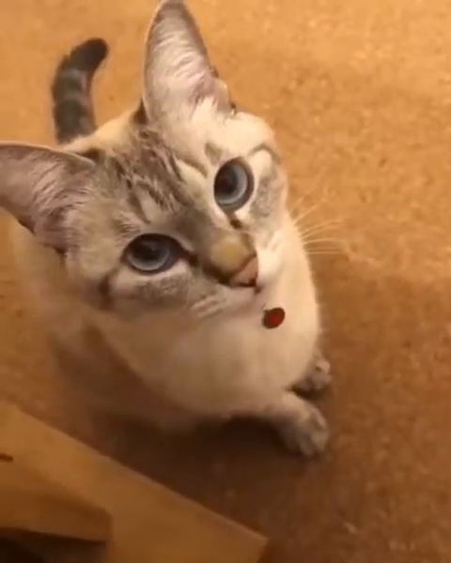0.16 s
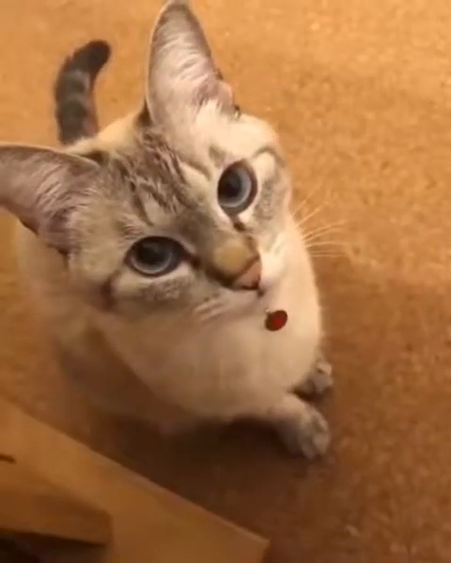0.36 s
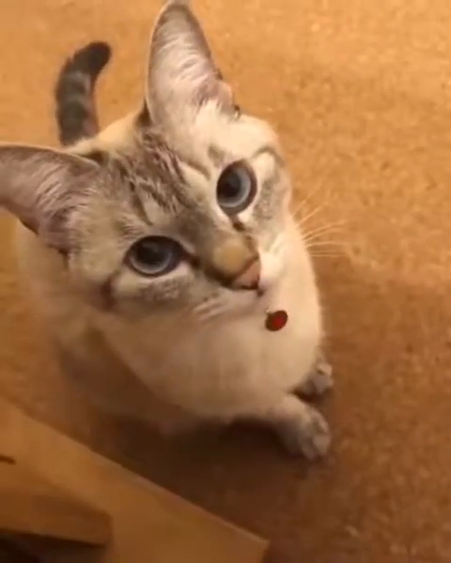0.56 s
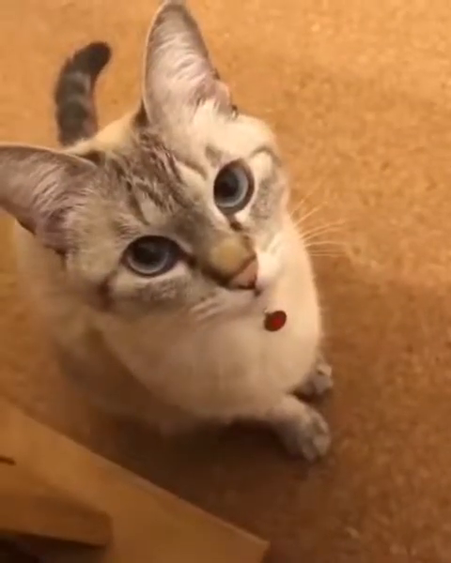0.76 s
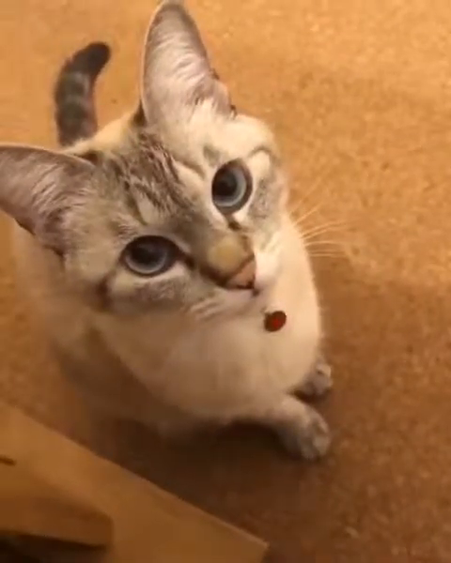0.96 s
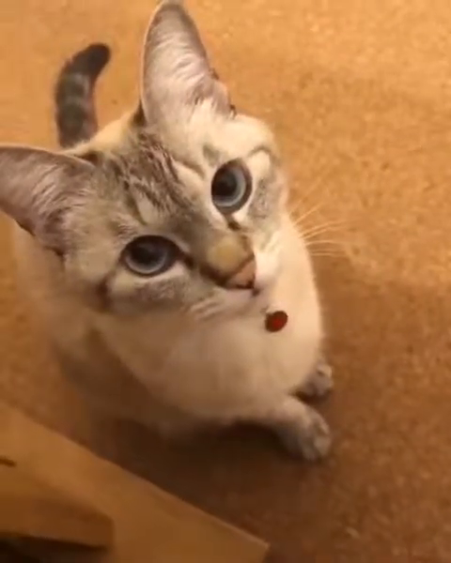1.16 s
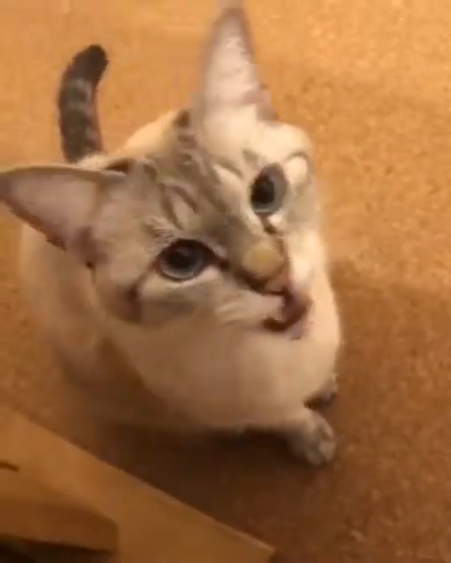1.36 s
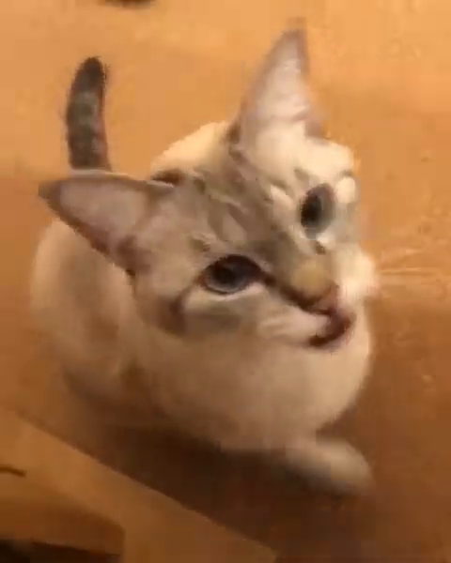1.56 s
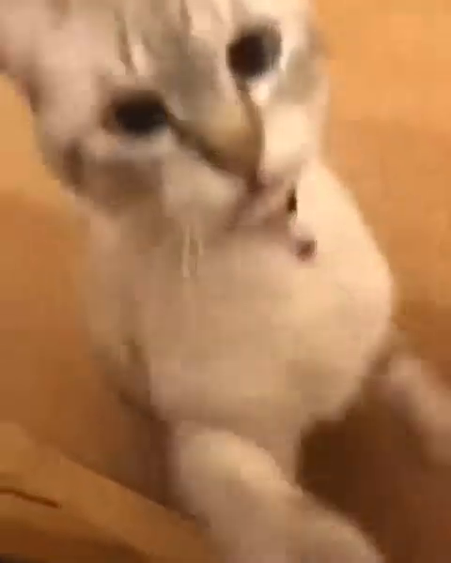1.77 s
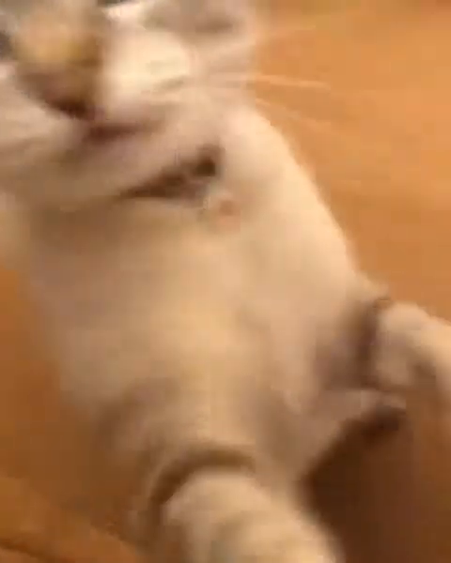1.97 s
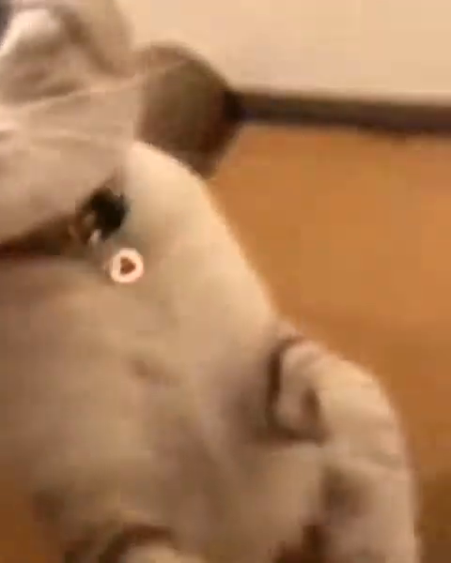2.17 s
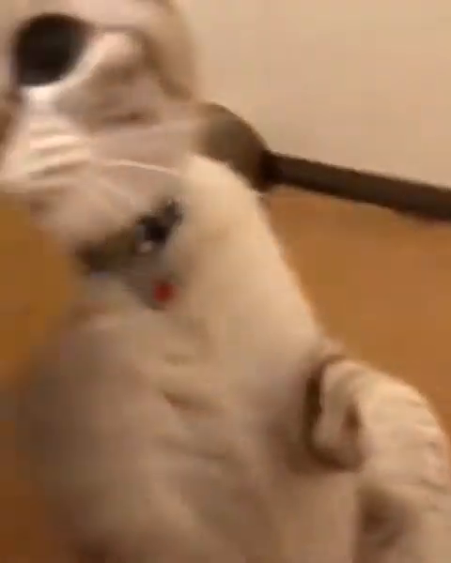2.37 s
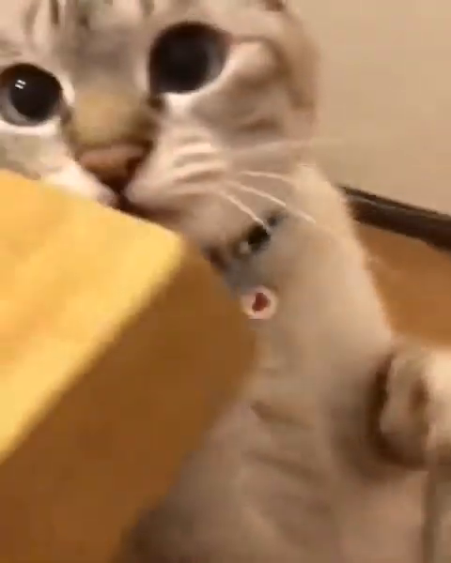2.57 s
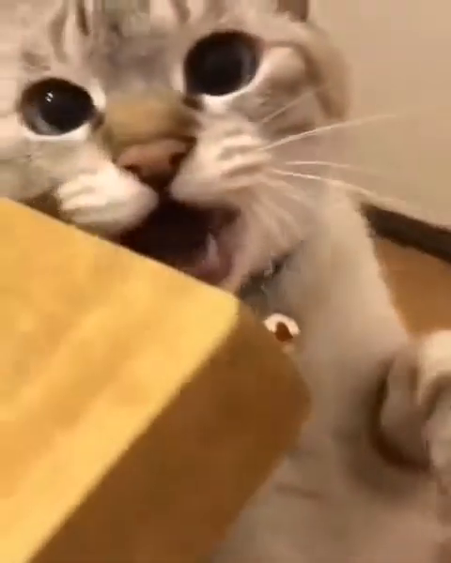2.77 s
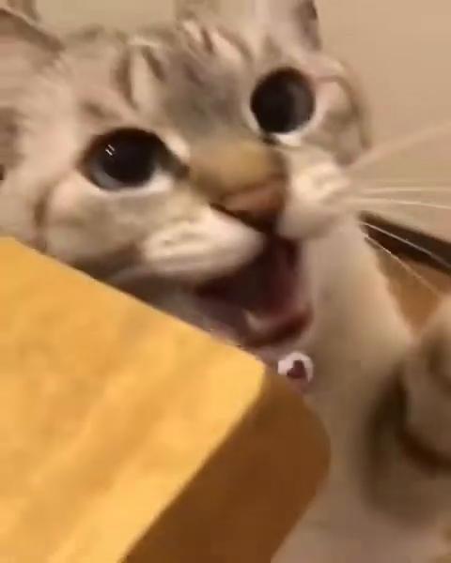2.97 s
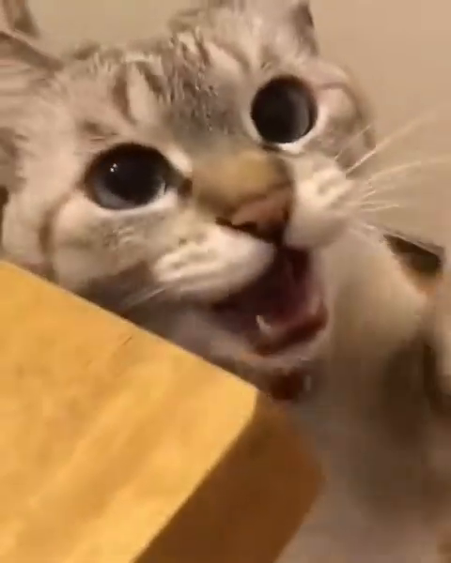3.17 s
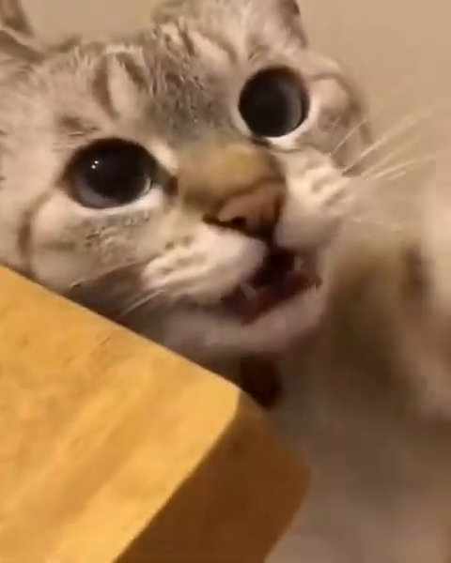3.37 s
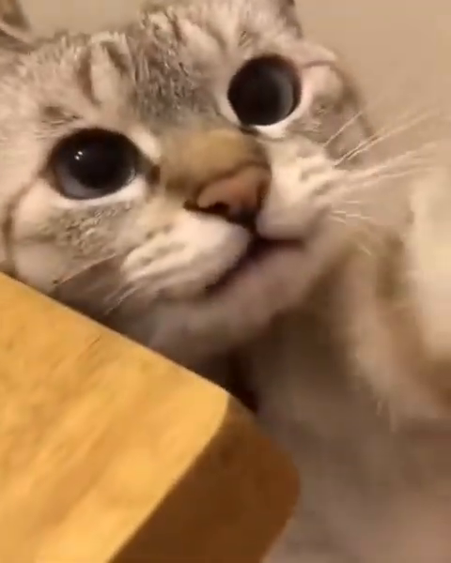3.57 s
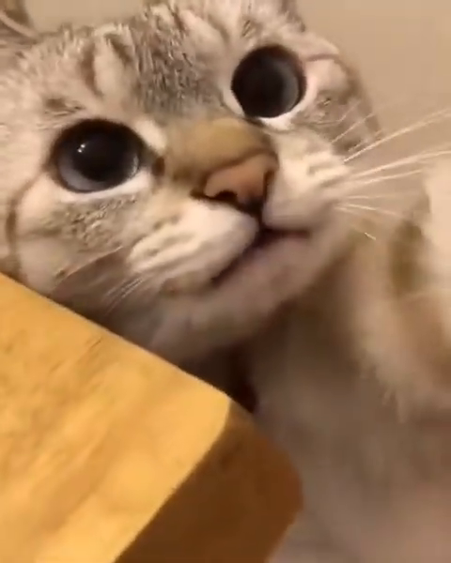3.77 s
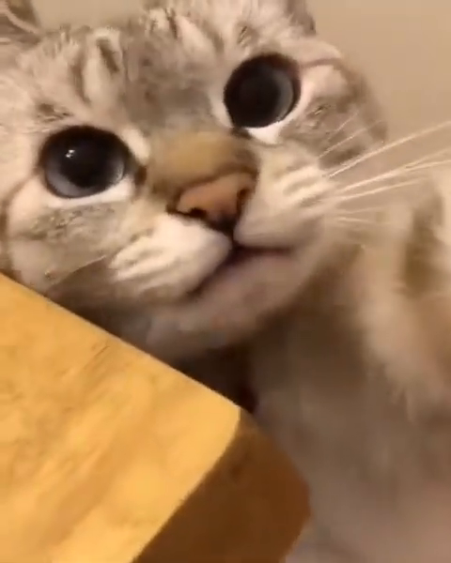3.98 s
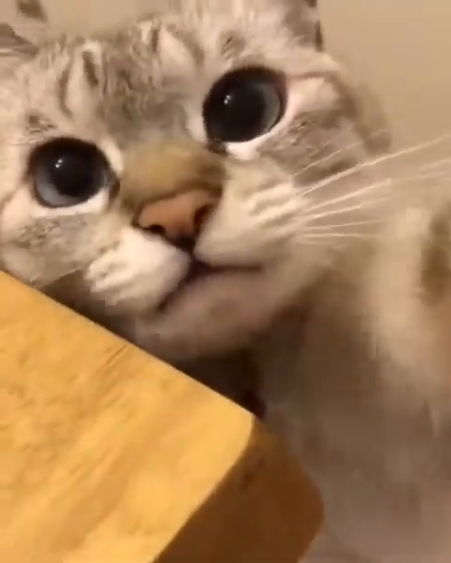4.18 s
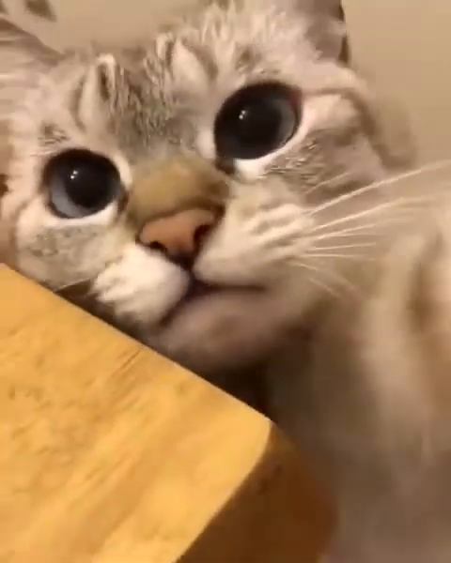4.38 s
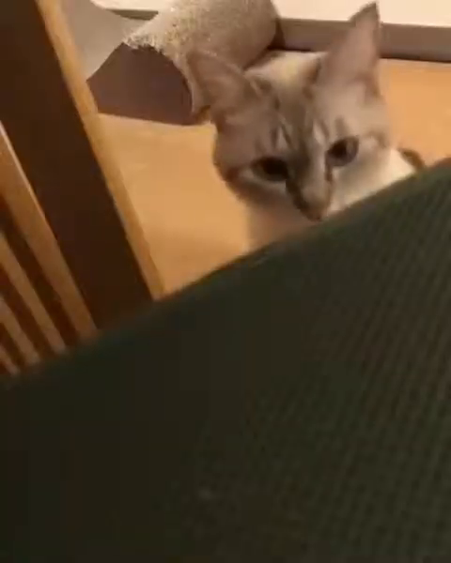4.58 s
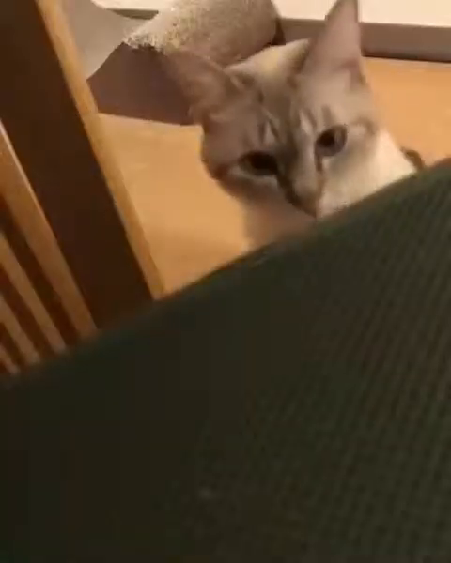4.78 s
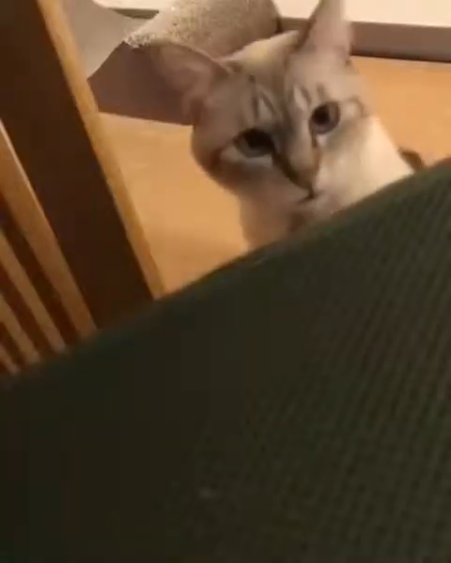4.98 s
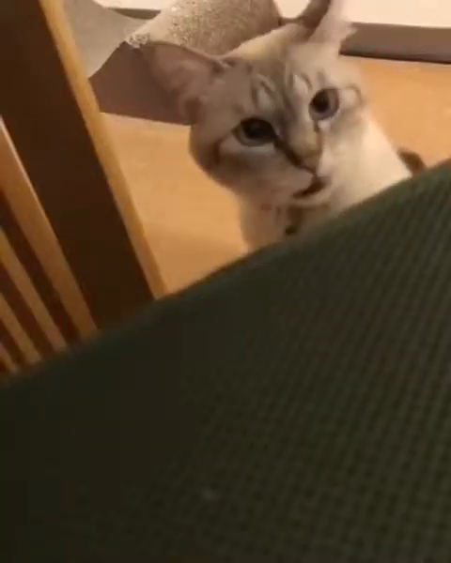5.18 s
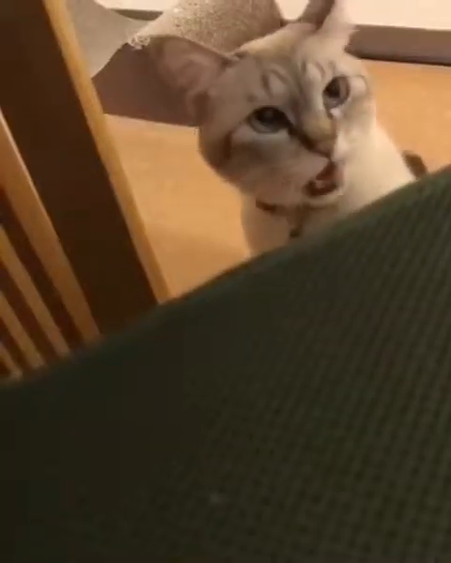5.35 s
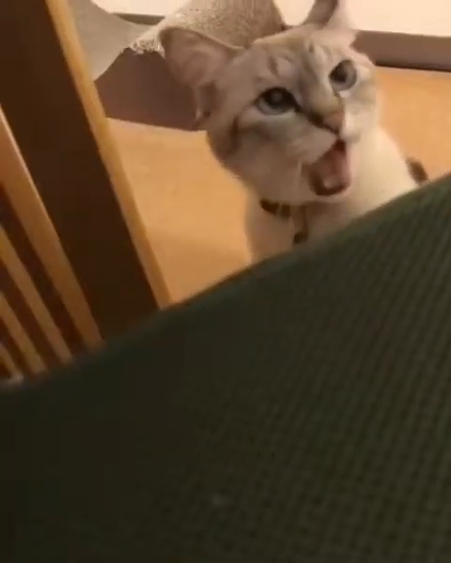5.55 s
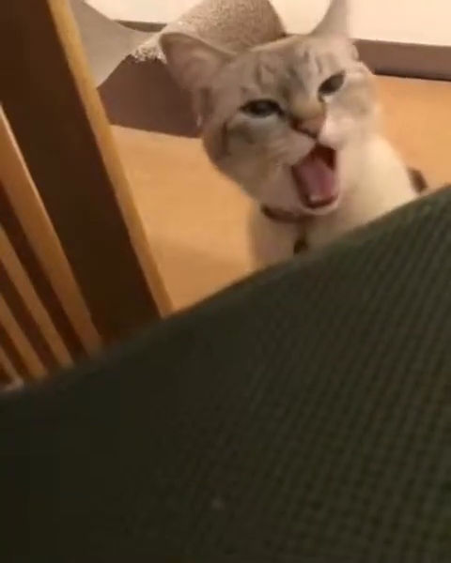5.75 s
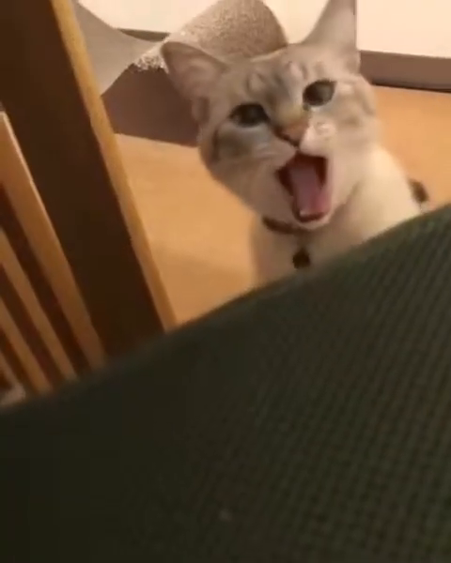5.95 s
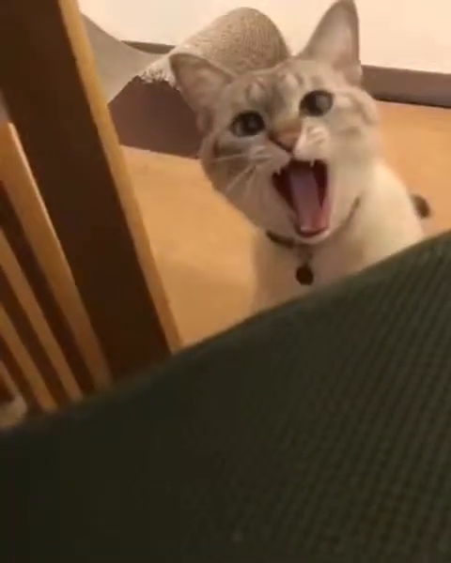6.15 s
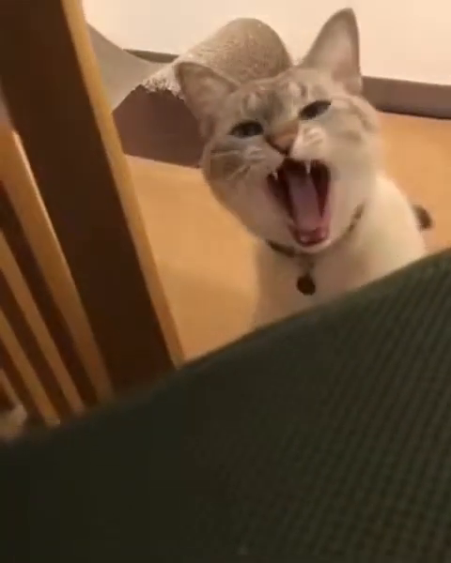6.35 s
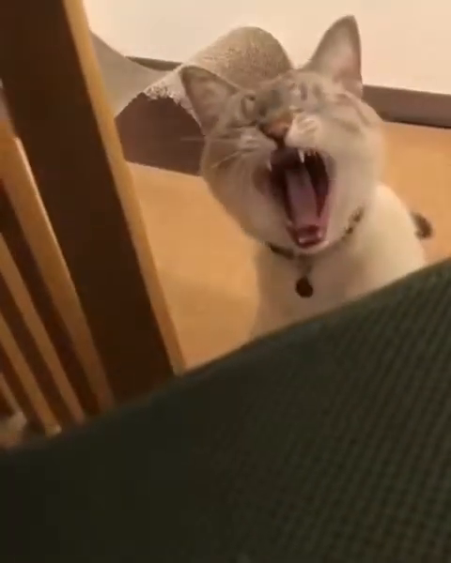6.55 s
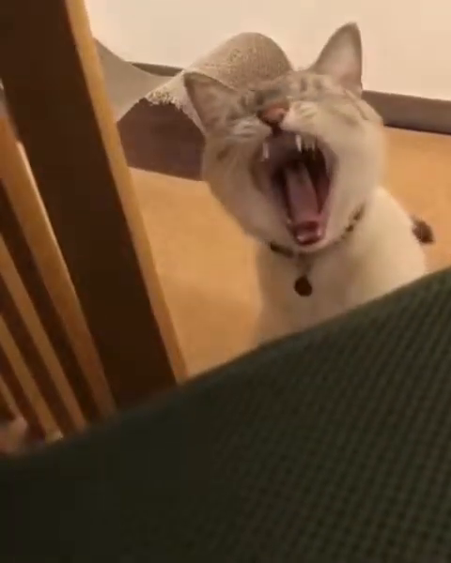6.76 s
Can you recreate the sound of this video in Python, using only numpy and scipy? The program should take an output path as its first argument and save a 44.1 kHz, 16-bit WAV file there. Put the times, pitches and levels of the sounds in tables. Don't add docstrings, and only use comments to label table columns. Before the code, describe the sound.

Quiet humming room, short cat mew, claws and paws scrambling, a fuller mew, brief silence, faint tag chinks, then a long sinking yawning meow.

```python
import sys
import numpy as np
from scipy import signal
from scipy.fft import rfft, irfft, next_fast_len
from scipy.io import wavfile
from scipy.ndimage import uniform_filter1d

SR = 44100
rng = np.random.default_rng(int(sys.argv[2]) if len(sys.argv) > 2 else 0)


def dump(signal):
    limited = np.clip(np.atleast_2d(signal).T, -1, 1)
    pcm = np.round(limited * 32767).astype(np.int16)
    wavfile.write(sys.argv[1], SR, pcm)


def natural_amplitude(level_db):
    exponent = np.asarray(level_db, float) / 20
    return 10 ** exponent


N = 300762
TIME = np.arange(N) / SR
CUT_START_S, CUT_END_S = 4.506, 4.651
LONGEST = 64000


def level(x, db):
    return x * natural_amplitude(db) / np.sqrt(np.mean(x ** 2))


def read(table, hz):
    f, db = np.transpose(table)
    return np.interp(np.log(np.maximum(hz, 1)), np.log(f), db)


def noise(table):
    size = next_fast_len(N)
    white = rfft(rng.standard_normal(size))
    hz = np.arange(len(white)) * SR / size
    return level(irfft(white * natural_amplitude(read(table, hz)), size)[:N], 0)


def band(x, lo_hz, hi_hz):
    return signal.sosfilt(signal.butter(2, [lo_hz, hi_hz], "band", fs=SR, output="sos"), x)


def walk(rate, size=N):
    k = max(int(SR / rate), 2)
    return level(uniform_filter1d(uniform_filter1d(rng.standard_normal(size), k), k), 0)


def chance(rate, n):
    return walk(rate, size=LONGEST)[:n]


def curve(table):
    s, db = np.transpose(table)
    return natural_amplitude(np.interp(TIME, s, db, left=-200, right=-200))


def bump(t, at, span, power):
    return np.exp(-(2 * (t - at) / span) ** power)


def room_tone(colour, db):
    return level(noise(colour) * natural_amplitude(0.4 * walk(2.5)), db)


# frequency in Hz, density in dB per Hz.
FIRST_AIR = [(15, -50), (25, -18), (49, -7.5), (65, 4.5), (81, -2), (108, -10), (147, -18), (245, -15),
             (274, -13), (320, -17), (399, -16.5), (446, -15), (499, -23), (5000, -43.5), (6500, -74),
             (11000, -120)]
# frequency in Hz, width in Hz, level in dB.
APPLIANCES = [(63, 21, -81.5), (273.1, 9, -76.5), (403, 9, -74)]


def first_room():
    tone = room_tone(FIRST_AIR, -61.5)
    for f, w, db in APPLIANCES:
        peak = [(f / 4, -120), (f - 3 * w, -40), (f, 0), (f + 3 * w, -40), (2 * f, -120)]
        tone = tone + natural_amplitude(db + 1.6 * walk(1.5)) * noise(peak)
    return tone


def hiss_and_edge():
    hiss = 0
    for lo in (4800, 6600, 8400, 10200):
        hi = lo + 1800
        colour = [(lo / 1.1, -30), (lo, 0), (hi, 0), (1.02 * hi, -30)]
        hiss = hiss + natural_amplitude(-93.5 + 2.2 * walk(45)) * noise(colour)
    edge_db = -102 + 10 * np.tanh(3 * walk(40) - 1)
    return hiss + natural_amplitude(edge_db) * noise([(12400, -40), (12600, 0), (13200, 0)])


# middle in seconds, length in seconds, frequency in
# Hz, change in dB.
MOVES = [(1.59, 0.071, 3500, -3), (1.895, 0.067, 2120, 18), (2.987, 0.17, 4970, 11.5),
         (3.494, 0.15, 5300, 7), (3.48, 0.12, 5300, 8.5), (3.497, 0.18, 5790, 9), (5.45, 0.15, 4460, 33),
         (5.795, 0.35, 4880, 11.5), (6.46, 0.21, 5800, 19), (6.1, 0.33, 5850, 7),
         (2.95, 0.2, 2700, -10), (3.154, 0.57, 3900, 3.5), (3.331, 0.17, 2880, -8), (1.595, .05, 2280, 7),
           (3.3, 0.14, 4205, -8), (5.38, 0.074, 1806, -17), (5.845, 0.53, 2350, -6), (6.41, 0.31, 2020, -9),
           (6.518, 0.21, 1220, 15), (6.115, 0.065, 2800, 2)]
# middle in seconds, length in seconds,
# frequency in Hz, change in dB.
SWAYS = [(1.3, 0.02, 1930, -11.5), (1.4, 0.042, 3400, -35), (1.76, 0.018, 2700, -17),
         (1.835, 0.016, 2900, -17), (1.5, .04, 3400, 5), (1.72, .08, 5100, -19), (2.6, .06, 3830, -4.5),
         (1.71, 0.023, 5200, 7.5), (1.735, .025, 5300, -9.5), (1.3, 0.041, 4350, 23),
         (1.91, .03, 2100, 5), (1.685, 0.066, 3300, -13), (1.75, .03, 4350, 3), (1.575, .04, 4400, 6.5),
         (1.6, 0.029, 1800, -13.5), (1.64, .03, 4400, -10.5), (1.67, 0.023, 6300, 11.5),
         (3.725, 0.03, 1750, 18.5), (2.2, 0.047, 3100, 5), (3.17, 0.14, 1555, 3), (1.9, 0.036, 1700, -4),
           (2.88, 0.084, 3300, -11.5), (2.895, .03, 4850, 12), (3.26, 0.18, 3050, -7),
           (3.11, 0.035, 3130, -10.5), (3.455, 0.027, 2930, -3), (3.49, 0.068, 2900, 5),
           (2.9, 0.097, 3400, 7.5), (2.925, 0.036, 3100, 6), (3.105, .04, 3900, 5.5),
           (3.07, .04, 4900, -12.5), (5.4, 0.055, 3400, -2), (3.16, .1, 6100, -11.5),
           (3.28, .04, 6000, -17), (3, 0.054, 5200, -7.5), (3, .05, 7800, -13), (3.46, .08, 1465, -1.5),
           (4.1, 0.084, 5800, 14.5), (3.43, 0.052, 5420, 5.5), (6, .04, 3600, -5),
           (3.455, 0.018, 5870, -16), (3.1, 0.32, 4150, 2), (3.3, 0.064, 4030, 3.5), (3.56, .2, 4300, 5.5),
           (2.78, .06, 1580, -8.5), (3.6, 0.12, 1430, -5), (3.58, 0.18, 1900, -3), (8.8, .03, 7000, 11.5),
           (3.0, 0.11, 12000, 7), (3.0, 0.11, 6750, 14), (2.6, 0.069, 2050, -16),
         (5.36, 0.015, 1570, 18.5), (5.39, 0.046, 2720, 2), (5.38, 0.037, 3500, -16),
           (5.6, 0.12, 2200, 5), (5.65, 0.027, 2100, 1), (5.65, 0.038, 1780, 9), (5.75, 0.25, 1810, -4),
           (5.71, 0.033, 1950, -10), (6.275, .07, 2400, -4), (6.66, 0.061, 1600, -4),
           (5.81, 0.13, 3200, -3.5), (5.88, 0.14, 3640, 8), (5.6, 0.14, 2800, -8), (5.57, 0.17, 4400, 9),
           (5.59, 0.095, 5900, -24), (5.69, .04, 5320, 5.5), (6.12, .07, 2630, -25), (6.11, 0.062, 1770, 5),
           (6.03, 0.059, 2900, -2), (6.11, 0.06, 3970, -12), (5.93, 0.048, 10000, -13),
           (5.4, .08, 4500, -2), (6.11, 0.092, 5730, -8), (6.01, .04, 5800, -13), (5.3, 0.17, 1300, -6),
           (6.31, .08, 5800, -8), (6.1, 0.06, 1800, -1), (6.69, .05, 920, -4), (5.77, 0.05, 5000, -10),
           (6.01, .03, 5300, -6), (5.47, .06, 4750, -9), (5.48, 0.074, 1740, 7), (5.51, .06, 3060, 2),
           (7.7, .08, 2150, 10), (6.2, 0.033, 5600, -8)]
STEP = 32
ORDER = np.arange(3, 19)[:, None]


def tract(t, pitch, gape, throat_db, mouth_db, peak_hz, colour, split_hz):
    hz = ORDER * pitch
    ring_db = 7 / (1 + ((hz - peak_hz) / 300) ** 2)
    move_db = sum(db * bump(t, at, span, 4) * np.exp(-((hz - f) / (.11 * f)) ** 2)
                  for at, span, f, db in MOVES)
    nose = np.clip(1 - gape / 0.41, 0, .5) * 2
    move_db += -24 * nose * np.exp(-((hz - 2300) / 270) ** 2)
    wander = [walk(45 * STEP, size=LONGEST // STEP)[:len(t)] for _ in ORDER]
    waver_db = (.3 + .17 * ORDER) * np.array(wander)
    lips_db = -23 * np.maximum(1 - gape / 0.54, 0) * np.clip((hz - 3700) / 600, 0, 1)
    gain = natural_amplitude(read(colour, hz) + ring_db + move_db + waver_db + lips_db)
    upper = np.clip((hz - split_hz) / 200 + .5, 0, 1)
    throat = natural_amplitude(throat_db) / np.sqrt(np.sum((gain * (1 - upper)) ** 2, axis=0) + 1e-12)
    mouth = natural_amplitude(mouth_db) / np.sqrt(np.sum((gain * upper * (hz < 4200)) ** 2, axis=0) + 1e-12)
    lag = .22 * ORDER ** 2 + 2 * np.arctan((hz - peak_hz) / 400)
    sway_db = sum(db * bump(t, at, span, 4) * np.exp(-((hz - f) / 210) ** 2)
                  for at, span, f, db in SWAYS)
    return gain * natural_amplitude(sway_db) * (throat * (1 - upper) + mouth * upper), lag


# frequency in Hz, level in dB.
AIR = [(4000, -35.5), (6500, 2), (7600, -1.5), (8800, -8.5), (10500, -2), (11800, -9), (13000, -11.5)]
AIR_EDGES_HZ = 3500, 5200, 6600, 8000, 9500, 11300, 13500
# middle in seconds, length in seconds, frequency in Hz, change in dB.
FLARES = [(1.574, .05, 12000, 10.5), (1.67, .03, 11000, 6.5), (1.864, .14, 13000, 3),
          (1.72, 0.0497, 7500, -4.5), (2.2, .06, 16000, 9), (2.2, .1, 7070, 6), (3.3, .55, 10200, 3.5),
          (3.25, 0.44, 8800, -4), (3.8, .25, 5800, 3), (3.58, .15, 11000, -3), (5.9, .3, 12000, 5),
          (5.98, 0.17, 8200, 12), (5.99, .08, 12300, -2.5), (2.83, 0.034, 11000, 23), (6.7, .2, 7000, -4)]


def teeth_hiss(on, flicker_db):
    t, air = TIME[on], noise(AIR)[on]
    out, slow = 0, level(uniform_filter1d(flicker_db, 900), 0)
    for k, (lo, hi) in enumerate(zip(AIR_EDGES_HZ, AIR_EDGES_HZ[1:])):
        middle = (lo + hi) / 2
        flare_db = sum(db * bump(t, at, span, 4) * np.exp(-((middle - f) / 1300) ** 2)
                       for at, span, f, db in FLARES if t[0] < at < t[-1])
        patch_db = 2.2 * np.roll(slow, 3100 * k)
        out = out + band(air, lo, hi) * natural_amplitude(flare_db + patch_db)
    return out


# start in seconds, end in seconds, roughness 0-1.
CRACKS = [(1.537, 1.569, 0.07), (1.603, 1.63, 0.15), (1.872, 1.897, 0.41), (1.919, 2.0, 0.21),
          (2.7, 2.86, .08), (3.684, 3.753, 0.07), (5.37, 5.48, 0.04), (6.579, 6.665, 0.24)]
# middle in seconds, length in seconds, change in dB.
GUSTS = [(1.579, 0.035, 4.5), (1.672, 0.013, 7), (1.766, 0.08, 4), (1.899, 0.049, 10.5), (2.943, 0.049, 9),
         (3.132, 0.11, -4.5), (1.616, .03, 2.5), (3.505, 0.17, 5), (5.691, 0.056, 0), (5.834, 0.13, 5),
         (5.958, 0.012, 8), (5.985, 0.013, 11), (6.015, .018, 6), (5.77, .015, 2), (6.084, 0.055, 0.5)]
# middle in seconds, length in seconds, change in dB.
SWAYS_SECOND = [(1.871, 0.06, 4.5), (2.929, 0.028, 4.5), (5.374, 0.038, -5.5), (5.568, 0.23, 1.5),
                (6.445, 0.048, 2), (6.59, .08, -5.5)]
# frequency in Hz, level in dB.
BREATH = [(250, -15), (600, -28), (1500, -12.5), (2500, 0), (3500, -4), (4400, -9), (5400, -7), (6800, -15),
          (9000, -22.5), (13000, -25.5)]


def meow(call, tongue, law, colour, split_hz, breath, teeth_db, sink):
    s, *columns = np.vstack(call).T
    on = (TIME > s[0]) & (TIME < s[-1])
    t, n = TIME[on], on.sum()
    hz, one_db, gape = (np.interp(t, s, c) for c in columns)
    peak_hz = np.interp(t, *np.transpose(tongue))
    gapes, *shares = np.transpose(law)
    two_db, throat_db, mouth_db = (one_db + np.interp(gape, gapes, c) for c in shares)
    late = (t - t.mean()) * (1 - gape)
    throat_db, two_db = throat_db + sink[0] * late, two_db + sink[1] * late
    two_db += sum(db * bump(t, at, span, 4) for at, span, db in SWAYS_SECOND)
    rough = sum(r * np.interp(t, [a - .01, a, b, b + .01], [0, 1, 1, 0]) for a, b, r in CRACKS)
    gust_db = 11 * rough + sum(db * bump(t, at, span, 2) for at, span, db in GUSTS)
    shut_db, wide_db, top_hz = breath
    breath_db = shut_db + (wide_db - shut_db) * gape + gust_db

    drift, jitter = 0.0024 * chance(48, n), (0.002 + .12 * rough) * chance(400, n)
    phase = 2 * np.pi * np.cumsum(hz * (1 + drift + jitter)) / SR
    settings = (c[::STEP] for c in (t, hz, gape, throat_db, mouth_db, peak_hz))
    sizes, lags = tract(*settings, colour, split_hz)
    voice = natural_amplitude(one_db) * np.sin(phase) + natural_amplitude(two_db) * np.sin(2 * phase - .8)
    for k, size, lag in zip(ORDER, sizes, lags):
        voice += np.interp(t, t[::STEP], size) * np.sin(k * phase - np.interp(t, t[::STEP], lag))
    voice *= -np.sqrt(2) * natural_amplitude((.3 + 4 * rough) * chance(200, n))

    whistle = chance(500, n) * np.sin(2 * np.pi * np.cumsum(peak_hz) / SR)
    flicker_db = 1.3 * chance(70, n)
    air = band(noise(BREATH)[on], 100, top_hz) + (0.59 + 4.1 * rough) * whistle
    puff = (1 + 0.65 * np.cos(phase)) * natural_amplitude(flicker_db) * air
    push_db = 0.6 * uniform_filter1d(np.maximum(gust_db, 0), SR // 40)
    teeth = natural_amplitude(mouth_db + teeth_db + push_db + flicker_db) * teeth_hiss(on, flicker_db)
    out = np.zeros(N)
    out[on] = voice + teeth + puff * natural_amplitude(breath_db) * np.hypot(natural_amplitude(throat_db), natural_amplitude(mouth_db))
    return out


# time in seconds, pitch in Hz, effort in dB, gape 0-1.
HUM_1 = [(1.442, 527, -70, 0.24), (1.451, 534, -45, 0.14), (1.476, 555, -44, 0.21),
         (1.5, 487.5, -39.5, 0.22), (1.53, 504, -43, .2), (1.536, 474, -47.5, 0.43)]
VOWEL_1 = [(1.564, 448, -43, 0.82), (1.6, 449.7, -44, 0.93), (1.62, 464, -48, 0.84), (1.64, 480, -48, 0.9),
           (1.684, 482.2, -48, 0.85), (1.723, 471.7, -45, 0.89), (1.746, 487, -45.5, 0.82),
           (1.843, 474.7, -48.5, 0.82)]
CLOSE_1 = [(1.866, 497, -63, 0.84), (1.892, 526, -50.5, 0.52), (1.913, 500, -38, 0.37),
           (1.934, 574, -44.5, 0.29), (1.972, 537, -44, 0.1), (2.009, 467, -81, 0.083)]
HUM_2 = [(2.691, 530, -87, .3), (2.706, 498, -47.5, .02), (2.734, 504, -46.5, 0.22), (2.79, 527, -41, 0.22),
         (2.82, 554, -43, 0.36), (2.836, 483.7, -41, 0.51), (2.897, 540.7, -43, 0.55)]
VOWEL_2 = [(2.909, 555.4, -45, 0.68), (2.938, 508, -48.5, 0.91), (3.01, 519, -46, 0.89),
           (3.103, 523.2, -43.5, 0.89), (3.174, 516, -45, 0.94), (3.319, 500.9, -45.5, 0.94),
           (3.59, 475.4, -48.5, 0.89), (3.649, 481, -48.5, 0.85)]
CLOSE_2 = [(3.682, 521, -47, 0.72), (3.706, 569, -49, 0.68), (3.72, 590, -45.5, 0.092),
           (3.751, 565, -67.5, 0.22)]
HUM_3 = [(5.35, 507.3, -94, 0.6), (5.359, 501.5, -51.5, 0.25), (5.373, 454.5, -50, 0.51),
         (5.417, 459, -47, 0.35), (5.447, 427.3, -49, 0.46)]
VOWEL_3 = [(5.504, 436.7, -55, 0.75), (5.588, 440.4, -52, 0.91), (5.743, 453.6, -50, 0.91),
           (5.846, 458, -49, 0.87), (6.075, 444.8, -49, 0.91), (6.24, 422, -50.5, 0.73),
           (6.284, 408.3, -46, 0.54), (6.401, 389.6, -50, 0.44)]
CLOSE_3 = [(6.515, 373.3, -49, 0.2), (6.545, 359, -52, 0.31), (6.619, 337.3, -48.5, 0.11),
           (6.64, 371.4, -50.5, 0.046), (6.666, 374, -59, .03), (6.689, 312, -54.5, 0.015),
           (6.717, 277, -57.5, .02), (6.749, 260, -89, 0.097)]
# time in seconds, frequency in Hz.
TONGUE_1 = [(1.47, 3100), (1.531, 2400), (1.611, 2250), (1.644, 2800), (1.821, 2820), (1.872, 2140),
            (2.0, 2200)]
TONGUE_2 = [(2.73, 3010), (2.829, 2810), (2.891, 2140), (3.321, 2200), (3.592, 2670), (3.68, 2045)]
TONGUE_3 = [(5.398, 2750), (5.45, 2220), (5.511, 2960), (5.8, 3110), (6.07, 3040), (6.24, 2716)]
# gape 0-1, second partial in dB, throat in dB, mouth in dB.
GAPE_1 = [(0, -36.5, -30.5, -34), (.25, -5, -32, -27.5), (.5, -3, -15, -20), (.75, -1, 3, -3),
          (1, 8, -0.5, 15)]
GAPE_2 = [(0, -39.5, -34, -31), (.25, -14, -25, -28), (.5, -0.5, -22, -22), (.75, 3.5, 3, -19.5),
          (0.999, 9, 8.5, 12)]
GAPE_3 = [(0, -27, -35, -42), (.25, -16, -19.5, -33.5), (.5, -6, -11.5, -21), (.75, 0.5, -2, -8.5),
          (1, 0.5, -6.5, 4.5)]
# frequency in Hz, level in dB.
COLOUR_1 = [(710, -30), (1200, -54), (1470, 18.5), (1810, 0.5), (2880, 1), (3160, -4.5), (3680, -11),
            (5340, -16.5), (6320, -63), (9000, -48), (11700, -76.5), (19800, -120)]
COLOUR_2 = [(710, -32), (1200, -5), (2150, -6), (2630, 0), (3330, -4.5), (3650, -11), (4400, -18.5),
            (5430, -26.5), (6420, -31), (9000, -52.5), (11700, -65.5), (19800, -120)]
COLOUR_3 = [(710, 18), (1200, 13.5), (2610, -1), (3190, 1.5), (3410, -5), (3710, -8.5), (4360, -25.5),
            (5470, -7.5), (6590, -25), (9000, -59), (11700, -69), (19800, -120)]
SPLIT_HZ = 2100, 2350, 2000
# lips shut in dB, mouth wide in dB, top frequency in Hz.
BREATH_DB = [(-6, -24, 11000), (-8, -22.5, 12000), (-24, -19, 13000)]
TEETH_DB = -30.5, -27, -29
# throat in dB per second, second partial in dB per second.
SINK_DB_PER_S = [(0.5, -4.5), (0.5, -5), (18, -4)]


def meows():
    lines = (HUM_1, VOWEL_1, CLOSE_1), (HUM_2, VOWEL_2, CLOSE_2), (HUM_3, VOWEL_3, CLOSE_3)
    tongues = TONGUE_1, TONGUE_2, TONGUE_3
    laws = GAPE_1, GAPE_2, GAPE_3
    colours = COLOUR_1, COLOUR_2, COLOUR_3
    calls = zip(lines, tongues, laws, colours, SPLIT_HZ, BREATH_DB, TEETH_DB, SINK_DB_PER_S)
    return sum(meow(*c) for c in calls)


def walls(x, t60=0.3, db=-24, damp_hz=3000):
    t = np.arange(int(.4 * SR)) / SR
    tail = band(rng.standard_normal(len(t)), 310, damp_hz) * natural_amplitude(-60 * t / t60) * (t > .004)
    return signal.fftconvolve(x, tail * natural_amplitude(db) / np.sqrt(np.sum(tail ** 2)))[:N]


# start in seconds, peak in dB, centre in Hz, treble in dB, 60 dB decay in seconds.
TICKS = [(1.527, -49, 1740, -83.5, 0.042), (1.5406, -39, 1603, -81, 0.02),
         (1.8514, -41.5, 2264, -56, 0.021), (1.928, -51.5, 3700, -88.5, 0.067),
         (2.0154, -60, 4890, -72.5, 0.017), (2.022, -75, 4730, -64, 0.011),
         (2.0343, -39.5, 2880, -50, 0.0092), (2.0472, -63, 4860, -77, 0.02),
         (2.06, -46.5, 2300, -74, 0.014), (1.894, -71, 3496, -62.5, .015), (2.154, -68, 1100, -90, 0.012),
         (2.08, -61.5, 3540, -60.5, 0.017), (2.0864, -47, 2300, -78, 0.024),
         (1.913, -71, 3480, -59.5, 0.015), (2.1204, -59, 1630, -63.5, 0.025),
         (2.222, -58.5, 2240, -73, 0.033), (2.2533, -61, 4970, -63, 0.0098),
         (2.2663, -61, 3080, -66, 0.033), (2.275, -63, 4310, -66.5, 0.018), (2.2949, -86, 1990, -68, 0.05),
         (2.543, -56.5, 1150, -89, 0.015), (2.838, -38.5, 1520, -80, 0.017),
         (2.9093, -33, 2230, -67, 0.027), (3.7656, -42, 1156, -69, 0.036),
         (5.355, -55.5, 1500, -110, 0.027), (2.129, -60, 4000, -68.5, 0.018), (2.055, -75, 3970, -71, .012),
         (2.094, -71, 4000, -71.5, .012), (2.816, -56, 2300, -90, .015), (6.276, -48, 1613, -86, 0.019),
         (6.619, -67, 5040, -78, .02)]


def ticks():
    out, t = np.zeros(N), np.arange(2000) / SR
    for s, db, hz, treble_db, t60 in TICKS:
        grit = rng.standard_normal((2, len(t)))
        fade = np.minimum(t / 0.0005, 1) * natural_amplitude(-60 * t / max(t60, .003))
        crack = grit[0] + 3 * (np.arange(len(t)) == 12)
        ring = level(band(crack, hz / 2.2, hz * 1.45), db - 5.0)
        spit = level(band(grit[1], 4600, 13000), treble_db + 3.0)
        out[int(s * SR):][:len(t)] += fade * (ring + spit)
    return out


# time in seconds, level in dB.
RUSTLE = [(1.95, -78), (2.05, -83), (2.19, -69.5), (2.24, -87), (2.38, -73.5), (2.6, -71), (2.72, -67.5),
          (2.86, -70)]
# time in seconds,
# level in dB.
THIN_HISS = [(1.72, -99), (1.8, -67.5), (1.92, -73), (1.97, -87.5), (2.18, -77.5), (2.33, -89)]


def rustle():
    grain = natural_amplitude(2.4 * walk(150) + 1.3 * walk(30))
    fur = noise([(400, -1.5), (900, 7.0), (2500, -4.5), (4500, -15.5), (7000, -30.5)])
    thin_hiss = curve(THIN_HISS) * natural_amplitude(2 * walk(40)) * noise(AIR)
    return grain * curve(RUSTLE) * fur + thin_hiss


# start in seconds, peak in dB, centre in Hz.
THUDS = [
    (1.929, -44.5, 149),
    (2.153, -45.5, 385),
    (2.176, -40.5, 147),
    (2.822, -38, 262),
    (3.768, -41.5, 434),
    (6.28, -35.5, 410),
]


def thuds():
    out, t = np.zeros(N), np.arange(3000) / SR
    shape = np.minimum(t / .002, 1) * np.exp(-t / .005)
    for s, db, hz in THUDS:
        out[int(s * SR):][:len(t)] += natural_amplitude(db - 3) * np.sin(2 * np.pi * hz * t) * shape
    return out


def gap_trace():
    trace = natural_amplitude(-100) * noise([(100, 0), (400, -10), (1500, -20), (12000, -28)])
    return trace * (np.abs(TIME - 4.564) > .031)


# frequency in Hz, density in dB per Hz.
SECOND_AIR = [(15, -26), (30, 0), (70, -2.5), (130, -2.5), (200, 0), (300, 0.5), (450, -9), (600, -12),
              (2600, -24.5), (4500, -25), (7000, -44.5)]
# frequency in Hz, level in dB.
FRIDGE = (100.5, -69)


def second_room():
    hz, db = FRIDGE
    swell = natural_amplitude(db + 3 + 0.64 * walk(4.7))
    fridge = swell * np.sin(2 * np.pi * hz * TIME + .5 * walk(2.7))
    return room_tone(SECOND_AIR, -70.5) + fridge


# start in seconds, frequency in Hz, level in dB, 60 dB decay in seconds.
TAG = [
    (4.761, 4360, -70, 0.039),
    (4.768, 3930, -70.5, 0.044),
    (5.196, 2860, -59.5, 0.024),
    (5.197, 5360, -65.5, 0.023),
]


def tag():
    out, t = np.zeros(N), np.arange(3000) / SR
    for s, hz, db, t60 in TAG:
        ring = natural_amplitude(db - 60 * t / t60) * np.sin(2 * np.pi * hz * t)
        out[int(s * SR):][:len(t)] += np.minimum(t / 0.0018, 1) * ring
    return out


def scene():
    near = meows() + ticks() + thuds() + tag()
    first = np.where(TIME < CUT_START_S, first_room(), 0)
    second = np.where(TIME > CUT_END_S, second_room(), 0)
    return (near + walls(near) + rustle() + first + second)[None]


def low_pass(x):
    return signal.sosfilt(signal.butter(12, 13080, fs=SR, output="sos"), x)


def record(dry):
    live = (TIME < CUT_START_S) | (TIME > CUT_END_S)
    return low_pass(dry + np.where(live, hiss_and_edge(), gap_trace()))


dry = scene()
out = record(dry)
dump(out)
```